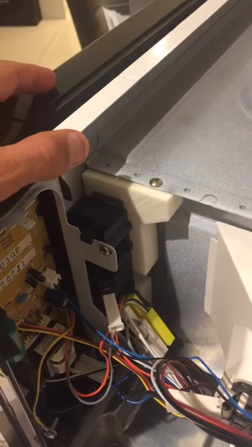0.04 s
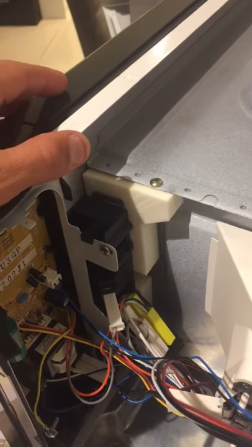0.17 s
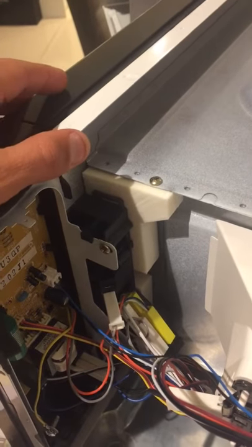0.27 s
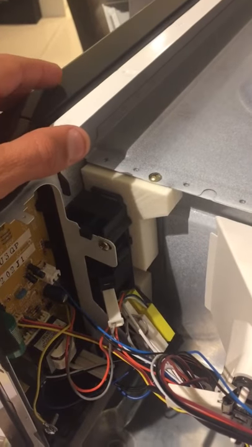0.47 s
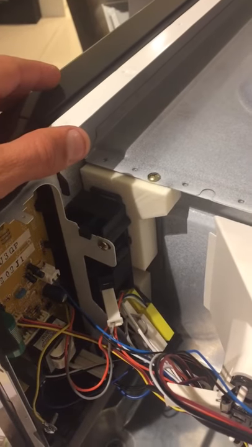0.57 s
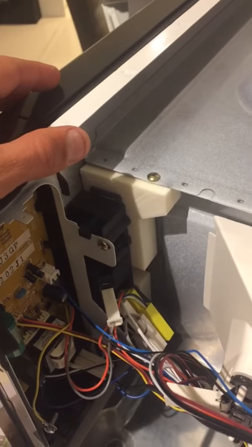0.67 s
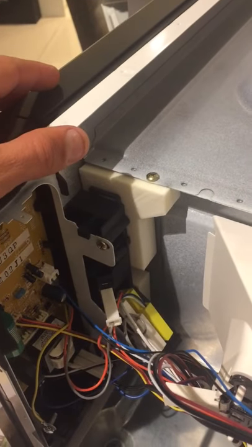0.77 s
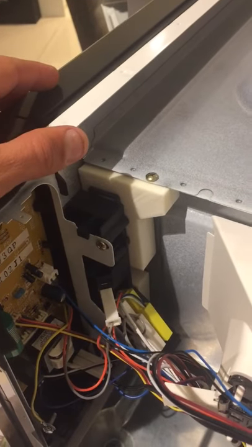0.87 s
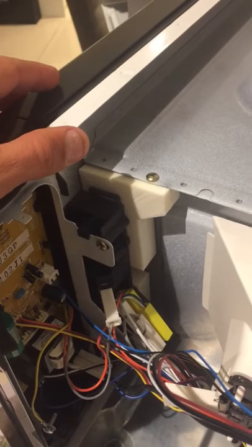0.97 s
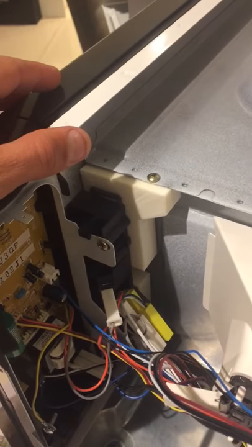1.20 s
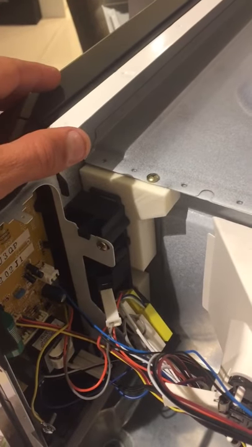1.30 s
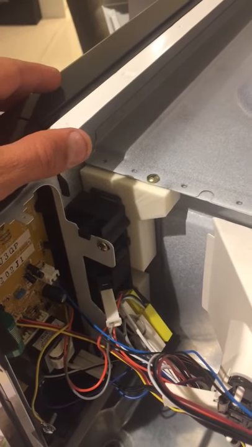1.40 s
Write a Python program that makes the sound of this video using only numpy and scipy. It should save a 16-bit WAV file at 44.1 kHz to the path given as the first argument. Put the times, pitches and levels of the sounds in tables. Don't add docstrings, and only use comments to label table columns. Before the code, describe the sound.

A microwave oven door shuts close to the microphone in a hard-walled room. Faint hiss and low rumble first; from about 0.1 s soft plastic rubbing, ticks at 0.19 s, then a sharp latch snap and loud, clipped, hollow bang at 0.21-0.23 s. Tiny bounces follow until 0.37 s. Boxy steel ring and room echo fade through about 1 s, leaving faint hiss.

```python
import sys
import numpy as np
from scipy import signal
from scipy.fft import rfft, irfft
from scipy.io import wavfile
from scipy.ndimage import uniform_filter1d, map_coordinates

SR = 44100
rng = np.random.default_rng(int(sys.argv[2]) if len(sys.argv) > 2 else 0)


def boost(x):
    u = np.asarray(x, float) / 20
    return 10 ** u


def persist_wave(psi):
    counts = np.round(np.clip(psi, -1, 1) * 32767).astype(np.int16)
    wavfile.write(sys.argv[1], SR, np.atleast_2d(counts).T)


N = 63945
T = np.arange(N) / SR
BANG_S = 0.213

# (time [s], strength [dB])
THUDS = [
    (0.2126, -20),
    (0.2173, -11.5),
    (0.2201, -4),
    (.2296, -4),
    (.2462, -16),
    (.2660, -13.5),
    (0.2862, -16),
    (0.365, -21.5),
]
SWING = [1, -1, 1, 1, 1, 1, 1, 1]
# (frequency [Hz], level [dB], time to fall 60 dB [s])
BOOM = [(58, -17, 0.15), (104.5, -10, 0.28), (138, -1, 0.37), (148, -8.5, 0.27), (207.4, -8, 0.16),
        (234.56, -9, 0.44), (310.7, -2, 0.1)]
# (frequency [Hz], level [dB], time to fall 60 dB [s])
CASE_RING = [(99.5, -35, 0.61), (129.2, -13.5, 0.82), (152, -25, .95), (157, -21, 1.4), (169.6, -21, 1.4),
             (191.7, -18.5, 0.7), (225.6, -21.5, 1.375), (227, -21.5, 0.38), (248.8, -19.5, .9),
             (276.1, -26.5, 1.4), (367.5, -21, 0.98), (539, -39, 1.1), (624, -38, 1.8), (802, -33.5, 1.2)]
# (frequency [Hz], level [dB], time to fall 60 dB [s])
TRIM_RING = [(711, -35, 0.93), (1064, -30, .9), (1116, -41, 1.1), (1459, -36.5, 0.6), (1620, -29, .8),
             (1677, -32.5, 1.1), (2363, -29, .75), (2732, -38, .6), (3410, -39.5, .6), (4247, -36.5, .3),
             (6500, -46, 0.59), (9900, -57.5, .7), (11000, -61.5, 0.7), (12080, -51.5, .25)]
# (frequency [Hz], level [dB], time to fall 60 dB [s])
FRAME = [(428, -22, 0.13), (652, -7.5, .09), (734, -23, .1), (863.4, -19.5, .09), (1227, -18, 0.084),
         (1290, -15.5, .1), (1474, -22, 0.04), (1528, -18.5, 0.21), (1632, -22, .12), (1805, -20, 0.11)]
# (time [s], strength [dB])
KNOCK = [
    (.2108, 2.5),
]
# (time [s], strength [dB], chatter length [s], snap share [dB])
HOOKS = [
    (.1914, -19.5, .005, -14),
    (.1997, -19, .003, -2),
    (.2028, -15, .003, -7),
    (.2086, -14, .002, 0),
    (.2101, -3, .006, -2),
    (.2160, -8, .006, 0),
    (.2215, -13, .006, -3),
    (.2300, -18, .008, -8),
]
# (frequency [Hz], width [Hz], level [dB])
LATCH_RING = [(900, 140, -7.5), (1312, 150, -5.5), (1596, 150, -1.5), (1820, 450, -2.5), (2650, 310, -7),
              (3257, 380, 1), (4210, 230, -4.5), (5560, 210, -8), (6570, 750, -10), (8800, 400, -16.5),
              (12400, 790, -20.5), (14260, 930, -23.5)]
# (frequency [Hz], level [dB per Hz])
SNAP_TONE = [(180, -48), (300, -7), (2880, -5), (3540, -4.5), (5140, -13.5), (8860, -13.5), (17500, -20.5)]
# (time [s], pressure [dB])
SLIDE_PRESSURE = [
    (.09, -78),
    (.105, -58.5),
    (.122, -54),
    (.15, -49),
    (.18, -50),
    (.192, -36.5),
    (.205, -37),
    (.22, -76.5),
]
# (frequency [Hz], width [Hz], level [dB])
RAMP_RING = [(145, 30, 1), (475, 29, -13), (676, 40, -10), (900, 70, -5), (1150, 140, -7), (1390, 60, -12),
             (2530, 140, -14), (3500, 120, -17.5), (4230, 100, -20), (6710, 140, -19), (8250, 160, -20.5),
             (9520, 140, -22), (12000, 200, -25)]
# (frequency [Hz], level [dB per Hz])
RUB_TONE = [(40, -12), (136, 1), (270, -16.5), (1270, -12.5), (3000, -23), (7000, -34), (17500, -42)]
# (frequency [Hz], level [dB per Hz])
PANEL_TONE = [(40, -25.5), (150, -20), (350, -15.5), (620, -10.5), (1500, -6.5), (2600, -13), (5000, -28),
              (17500, -36.5)]
# (frequency [Hz], time to fall 60 dB [s])
PANEL_T60 = [(100, 0.067), (1000, 0.14), (4000, 0.39), (16000, 0.047)]
# (frequency [Hz], level [dB per Hz])
ROOM_TONE = [(40, -28.5), (140, -13.5), (350, -18.5), (700, -15.5), (1600, -20.5), (3300, -28.5),
             (8000, -35), (17500, -43.5)]
# (frequency [Hz], time to fall 60 dB [s])
ROOM_T60 = [(60, 0.67), (200, 0.97), (600, 0.81), (2000, 0.91), (4000, 0.73), (7500, 0.5), (12000, 0.27),
            (17000, .27)]
# (frequency [Hz], level [dB per Hz])
HISS_TONE = [(20, -32), (60, -15.5), (100, -12), (270, -14), (330, -19.5), (933, -23), (9090, -32),
             (18000, -42.5)]
# (time [s], level [dB])
RUMBLE_LEVEL = [
    (0, -59),
    (.03, -65),
    (.4, -62.5),
    (.62, -67),
    (1.0, -78),
    (1.33, -78),
    (1.38, -65),
    (1.43, -78),
]
# (time [s], gain [dB])
GAIN = [
    (.24, 0),
    (.3, -2.5),
    (.4, -3),
    (.46, 1),
    (.62, 2),
    (.74, 2.5),
    (.78, 1),
    (1.05, -0.5),
]


def case():
    case_db = -8
    waver, waver_s = 0.45, 0.04
    out = struck(190, -1, 0.04, THUDS)
    for hz, db, t60 in BOOM:
        out += struck(hz, db + case_db, t60, THUDS)
    for hz, db, t60 in FRAME:
        out += struck(hz, db, t60, KNOCK)
    steps = np.arange(0, N / SR + 2 * waver_s, waver_s)
    for modes, hits in ((CASE_RING, THUDS), (TRIM_RING, KNOCK)):
        for hz, db, t60 in modes:
            drift = map_coordinates(rng.standard_normal(len(steps)), [T / waver_s], order=3)
            out += (1 + waver * drift) * struck(hz, db + case_db, t60, hits)
    return out


def latch():
    snap_db, ring_db, damping = -2.5, -5, 2.5
    train = clicks(per_s=11000, spread_db=0)
    snap_shape, ring_shape = np.zeros(N), np.zeros(N)
    for start_s, db, length_s, snap_share_db in HOOKS:
        shape = boost(db) * (T >= start_s) * np.exp(-np.maximum(T - start_s, 0) / length_s)
        ring_shape += shape
        snap_shape += boost(snap_share_db) * shape
    snap = snap_shape * evened(colour(train, SNAP_TONE))
    knocks = ring_shape * train
    ring = np.zeros(N)
    for hz, width, db in LATCH_RING:
        damped = width * damping
        ring += boost(db) * narrow(knocks, hz, damped) * np.sqrt(SR / damped / 10)
    return boost(snap_db) * snap + boost(ring_db) * ring


def slide():
    ring_db, rub_db = -5, 1
    shrill_hz, shrill_lag_s = 3000, 0.02
    slips = clicks(per_s=20000, spread_db=0.91)
    ring = np.zeros(N)
    for hz, width, db in RAMP_RING:
        lag_s = shrill_lag_s if hz > shrill_hz else 0
        ring += boost(db) * evened(narrow(slips, hz, 2.5 * width)) * pressure(lag_s)
    rub = evened(colour(slips, RUB_TONE)) * pressure(shrill_lag_s / 2)
    return boost(ring_db) * ring + boost(rub_db) * rub


def pressure(lag_s):
    return boost(np.interp(T - lag_s, *np.transpose(SLIDE_PRESSURE), left=-200, right=-200))


def tails():
    gate_s, gate_db_per_s = 0.75, 18
    panels = dying(PANEL_TONE, PANEL_T60, level_db=-12, rise_s=0.0066)
    room = dying(ROOM_TONE, ROOM_T60, level_db=-18.5, rise_s=0.015)
    return (panels + room) * boost(-gate_db_per_s * np.maximum(T - gate_s, 0))


def background():
    hiss = evened(colour(rng.standard_normal(N), HISS_TONE))
    rumble = evened(narrow(rng.standard_normal(N), 79.83, 150))
    return boost(-70.5) * hiss + boost(np.interp(T, *np.transpose(RUMBLE_LEVEL))) * rumble


def struck(hz, db, t60, hits):
    thud_s = 0.0006
    blows = np.zeros(N)
    for (start_s, hit_db), swing in zip(hits, SWING):
        blows[round(start_s * SR)] = swing * boost(hit_db + db)
    pole = boost(-60 / t60 / SR) * np.exp(2j * np.pi * hz / SR)
    soft = np.exp(-1 / (thud_s * SR))
    ringing = signal.lfilter([1], [1, -pole], blows + 0j)
    missing_start = signal.lfilter([1], [1, -pole * soft], blows + 0j)
    return (ringing - missing_start).imag


def dying(spectrum, t60s, level_db, rise_s):
    uneven_db, uneven_hz = 3.0, 12
    bumps = uniform_filter1d(rng.standard_normal(N // 2 + 1), round(uneven_hz * N / SR))
    noise = colour(rng.standard_normal(N), spectrum)
    modes = irfft(rfft(noise) * boost(uneven_db * evened(bumps)), N)
    hz, t, z = signal.stft(evened(modes), SR, nperseg=256, noverlap=192)
    z = z * boost(-60 * np.maximum(t - BANG_S, 0) / read(t60s, hz)[:, None])
    tail = signal.istft(z, SR, nperseg=256, noverlap=192)[1][:N]
    rise = 1 - np.exp(-np.maximum(T - BANG_S, 0) / rise_s)
    return boost(level_db) * rise * tail


def clicks(per_s, spread_db):
    where, size, sign = rng.random((3, N))
    heights = boost(-spread_db * np.log(size + 0.01)) * np.sign(sign - 0.5)
    return evened((where < per_s / SR) * heights)


def narrow(x, hz, width):
    return resonate(resonate(x, hz, width), hz, width)


def resonate(x, hz, width):
    r = np.exp(-np.pi * width / SR)
    return 2 * signal.lfilter([1 - r], [1, -r * np.exp(2j * np.pi * hz / SR)], x + 0j).real


def colour(x, spectrum):
    hz = np.fft.rfftfreq(len(x), 1 / SR)
    return irfft(rfft(x) * boost(read(spectrum, hz)), len(x))


def read(points, hz):
    f, value = np.transpose(points)
    return np.interp(np.log(hz + 1), np.log(f + 1), value)


def evened(x):
    return x / np.sqrt(np.mean(x ** 2) + 1e-20)


def scene():
    door = case() + latch() + slide() + tails()
    gain = boost(np.interp(T, *np.transpose(GAIN)))
    return (door * gain + background())[None]


def band_limit(x):
    return signal.sosfilt(signal.butter(12, 18350, fs=SR, output="sos"), x)


def record(dry):
    bass_hz, edge_hz = 30, 17250
    ceiling, knee = 0.97, 8.0
    thin = signal.sosfilt(signal.butter(1, bass_hz, "high", fs=SR, output="sos"), dry)
    clipped = thin / (1 + abs(thin / ceiling) ** knee) ** (1 / knee)
    treble_cut = signal.firwin(255, edge_hz, window=("kaiser", 7), fs=SR)
    mix = signal.oaconvolve(clipped, treble_cut[None], "same")
    return band_limit(mix)


dry = scene()
out = record(dry)
persist_wave(out)
```